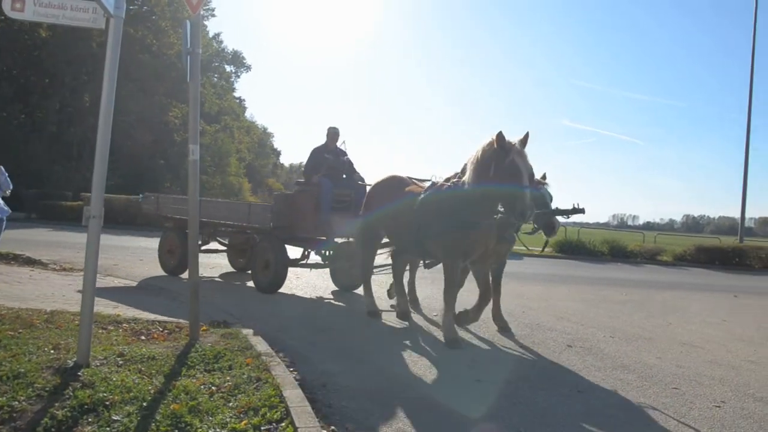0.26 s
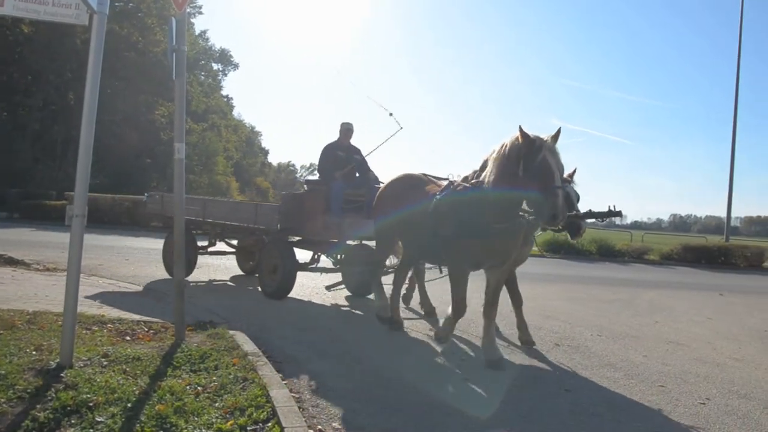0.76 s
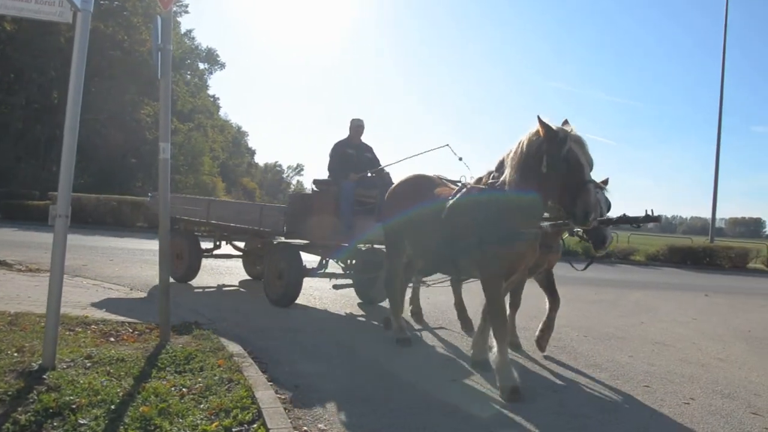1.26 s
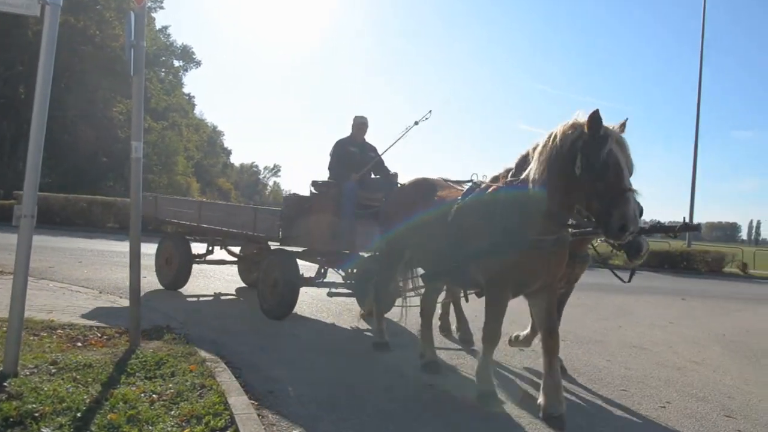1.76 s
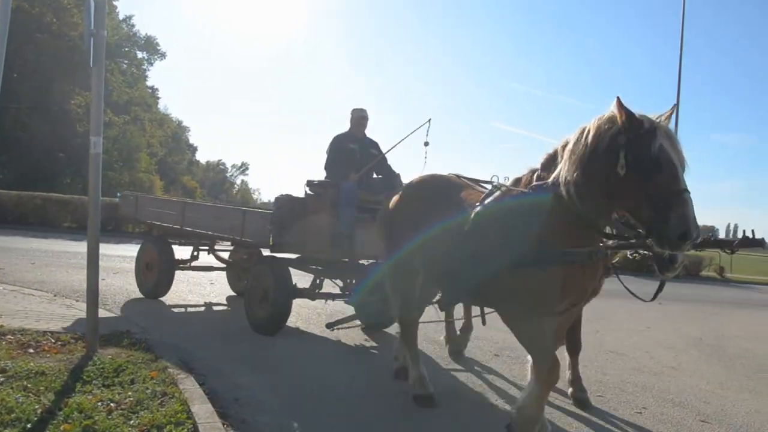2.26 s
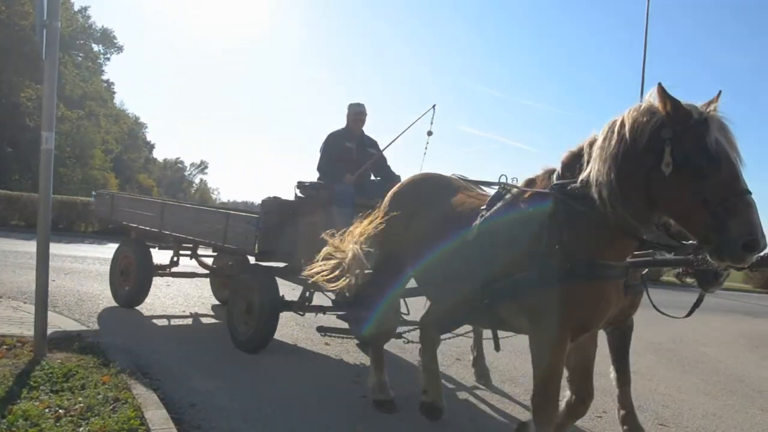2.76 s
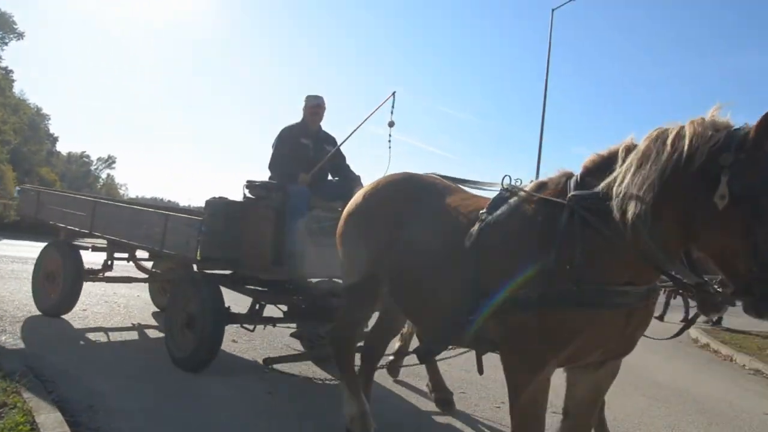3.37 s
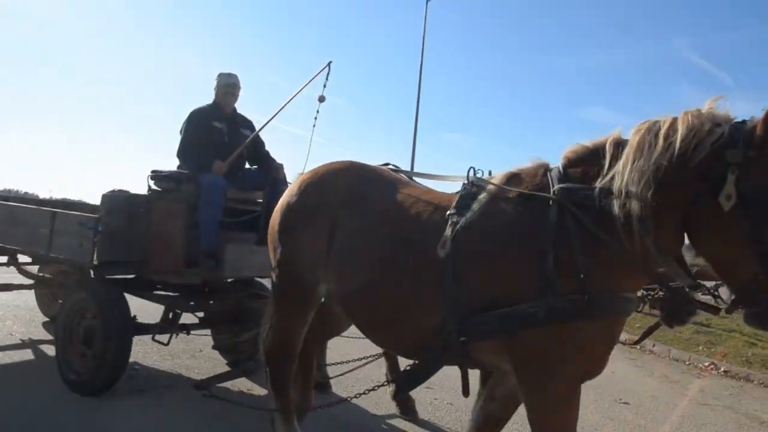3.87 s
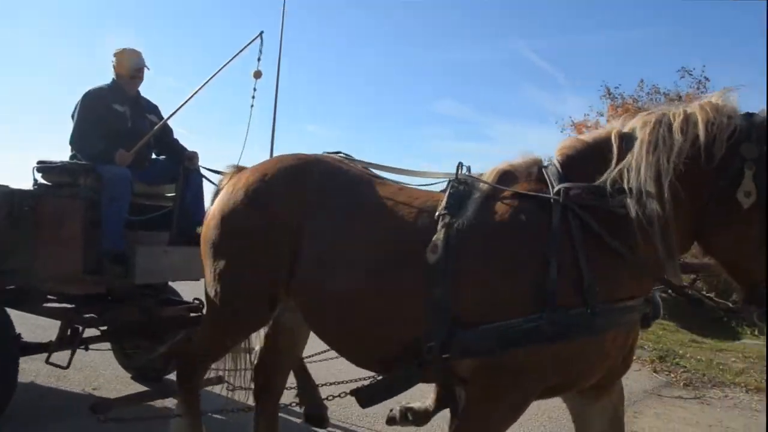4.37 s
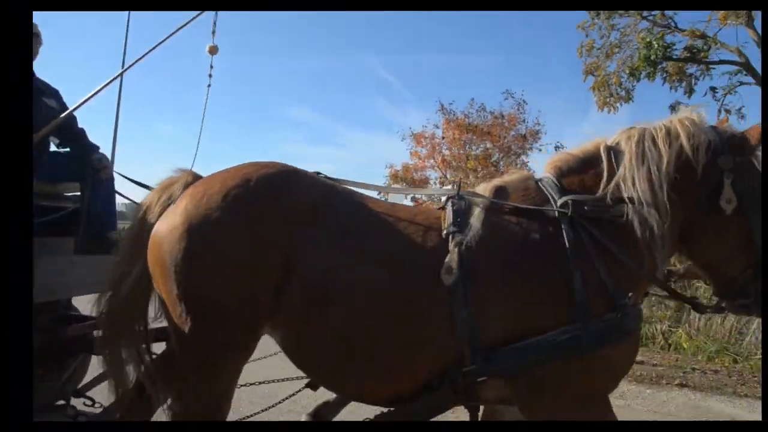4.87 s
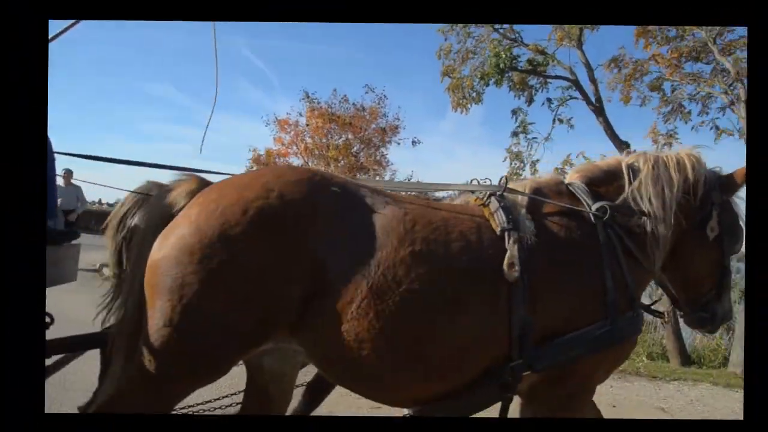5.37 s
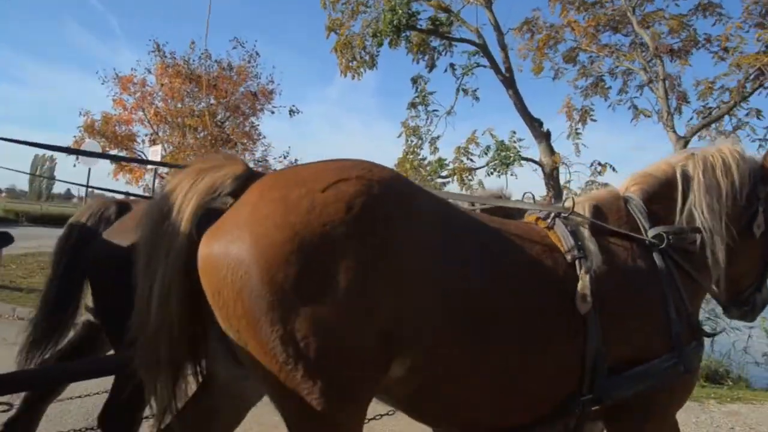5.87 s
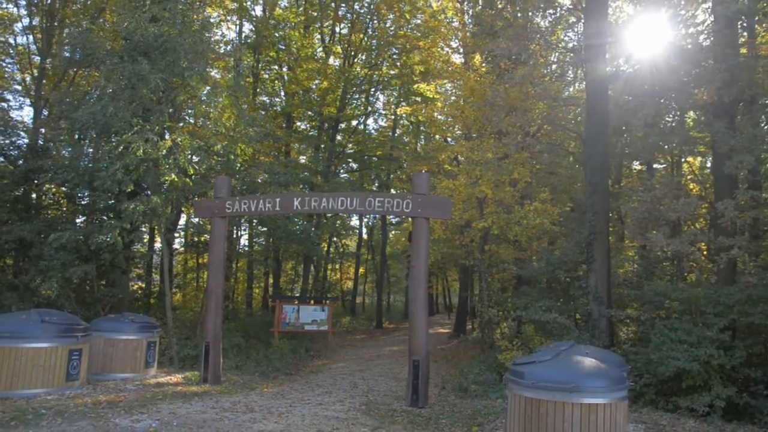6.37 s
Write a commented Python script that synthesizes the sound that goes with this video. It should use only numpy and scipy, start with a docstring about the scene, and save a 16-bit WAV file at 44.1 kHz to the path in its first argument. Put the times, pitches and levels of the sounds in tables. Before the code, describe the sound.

Two draught horses walk a wooden cart nearer, hooves knocking and harness ticking as wind buffets the microphone, until faint woodland ambience abruptly takes over.

```python
"""On a paved road, microphone about 5 m from two shod draught horses walking a wooden cart. From the start
hooves knock and slide on grit, harness links and shoes tick, wheels rumble and gusts buffet the microphone. A
dry cart joint squeaks at 1 s and, faintly, near 5 s; a thin whine comes and goes between 2 and 3 s. From almost
8 m the team then closes to 2.5 m. At 6 s the road cuts off and a quiet wood edge fades in: leaves, far traffic,
a few small ticks and the whine once more."""
import sys
import numpy as np
from scipy import signal
from scipy.fft import rfft, irfft, next_fast_len
from scipy.io import wavfile
from scipy.ndimage import uniform_filter1d, map_coordinates

SR = 44100
rng = np.random.default_rng(int(sys.argv[2]) if len(sys.argv) > 2 else 0)


def materialize(psi):
    """Save the field psi as 16-bit PCM at rate SR to the path in sys.argv[1].

    A 1-D psi becomes a single channel; in a 2-D psi each row is a channel.
    """
    bounded = np.clip(np.atleast_2d(psi).T, -1, 1)
    quanta = np.round(bounded * 32767).astype(np.int16)
    wavfile.write(sys.argv[1], SR, quanta)


N = 291501
T = np.arange(N) / SR
ROAD_END_S = 5.966
# from the microphone to the team: (time [s], distance [m])
TEAM_DISTANCE = [(0, 5.5), (2.8, 7.6), (4.6, 3.8), (5.96, 2.5)]


def hooves():
    """Each contact is a short blow and a slide over grit; they excite horn, hollow, iron and sand."""
    # shoe meets road: (time [s], level at the microphone [dB], clop pitch [Hz], thud [dB], shoe [dB],
    # grit [dB], scrape [dB]); the last four are relative to the clop
    contacts = [(0.001, -21.5, 1210, -12, -16, -25, -17), (0.201, -32.5, 1270, -15, -7, -43, 0.5),
                (0.227, -29, 1170, -30, -18, -34, -7), (0.352, -26.5, 1320, -25, -8, -34, 3.5),
                (0.538, -58.5, 1180, -14, 12, 3, 20.5), (0.574, -24.5, 1320, -24, 0.5, -24, -12),
                (0.614, -29, 1280, -13, -19, -43, -7), (0.625, -19.5, 1490, -18, -9.5, -29.5, -14.5),
                (0.649, -17, 930, -15, -16.5, -37, -10.5), (0.789, -25.5, 1520, -1.5, -17.5, -32.5, -6),
                (0.856, -25, 1450, -8.5, -24, -34, -19.5), (0.881, -31.5, 1030, -17, -7, -21.5, -10),
                (0.915, -26.5, 1350, -37, -10.5, -47, -3.5), (1.242, -28.5, 1350, -27, -7.5, -43, -27),
                (1.252, -26.5, 1300, -18, -26, -30, -2.5), (1.265, -27, 1380, -6, -8.5, -39.5, -11.5),
                (1.294, -29.5, 1410, -7, -23, -33, 1), (1.317, -34, 1510, 2, -10, -45.5, -8.5),
                (1.364, -27.5, 1580, -3.5, -16, -48.5, -5), (1.497, -36.5, 1360, -4.5, -9, -31, 0.5),
                (1.526, -17.5, 1094, -27, -37, -46.5, -5.5), (1.668, -25, 1460, -13, -4.5, -30.5, 3),
                (1.719, -42.5, 1290, -2, -6.5, -14, 5), (1.913, -23, 960, -5.5, -10.5, -24, 0),
                (1.926, -30, 850, -10, -10, -40, 13.5), (1.978, -18.5, 1085, -2.5, -5, -38, -21),
                (2.083, -40.5, 1460, 2, 0.5, -21.5, 0.5), (2.15, -26, 1390, -5, -2.5, -30.5, -16.5),
                (2.159, -26.5, 1370, -26, -7, -35, -8), (2.179, -30, 1360, 2, -5, -21, -18.5),
                (2.312, -20.5, 1580, -4.5, -7.5, -29, 2), (2.373, -30, 1220, -7.5, -12.5, -37, -8),
                (2.521, -23, 1140, -2, -4.5, -53, -16.5), (2.549, -21.5, 1460, -12.5, -12, -49, -9.5),
                (2.576, -27, 1350, -14, -12, -38.5, -16.5), (2.596, -29, 1420, -5, -13, -43, 0),
                (2.628, -25, 1120, -4, -16.5, -50, -7), (2.786, -33, 1240, -17, -1, -42, -13),
                (2.824, -29, 1100, -9, -12, -29, -1.5), (2.955, -24.5, 1420, -6, -4, -26.5, 4.5),
                (3.014, -34, 1360, -6, -26, -48, 8.5), (3.209, -22.5, 1050, -9.5, -4, -43, -24),
                (3.234, -17, 1040, -14, -17.5, -32, -14.5), (3.274, -27.5, 1180, -6, -17, -28, -6.5),
                (3.289, -34, 900, 2, -12, -40, -15), (3.311, -17.5, 1080, -21, -10, -36.5, -10.5),
                (3.401, -44.5, 1650, -14, -4.5, -8, 13), (3.468, -25.5, 1180, -4, -10, -43, -13),
                (3.49, -28.5, 1130, -9, -12, -27, -6), (3.556, -30.5, 1640, -8.5, -11, -46, 4),
                (3.641, -27, 990, -1.5, -29, -32.5, -6.5), (3.829, -33, 1140, -3, -15, -44, -15),
                (3.887, -30.5, 880, 0.5, -10.5, -25, -3.5), (3.9, -28.5, 1270, 4.5, -9, -31, -39),
                (3.921, -28.5, 940, -7, -3.5, -41, -6.5), (3.948, -26, 1050, -11, -16, -52, -5.5),
                (4.154, -21, 1020, 0.5, -50, -38, -20.5), (4.201, -37.5, 1470, -6, -9, -39, -18.5),
                (4.314, -37, 1520, -3.5, -12.5, -31, 0), (4.453, -20.5, 1030, -19.5, -11.5, -20, -11.5),
                (4.465, -12, 1000, -4.5, -21.5, -24, -28), (4.51, -30.5, 1100, -17, -19, -43, -10.5),
                (4.525, -25, 1270, -14.5, -5.5, -26.5, -2), (4.542, -21, 1030, 3.5, -21, -20, -15),
                (4.561, -22.5, 1200, -28, -1.5, -33, -19.5), (4.575, -18, 1240, -30, -21, -34, -13),
                (4.591, -12.5, 1120, -20.5, -10.5, -33.5, -11.5), (4.61, -22.5, 1440, -15, -7.5, -24, -9.5),
                (4.655, -20.5, 1240, -6, -10.5, -18, -14), (4.763, -28, 1360, -6, -8, -63, 7.5),
                (4.852, -31.5, 1427, 3, -12.5, -29.5, -5.5), (4.955, -38, 1130, -4.5, -4, -30, -9),
                (4.977, -27, 1240, -13, -9.5, -47, 11), (5.027, -22, 1840, -9, -8.5, -13.5, -12),
                (5.038, -23, 1870, -11, -15, -29, -12.5), (5.049, -22, 950, -6.5, -13, -31.5, -10),
                (5.109, -34.5, 1580, -6, -6.5, -17, -5.5), (5.126, -37.5, 1480, 0.5, -1.5, -11.5, -13),
                (5.152, -24, 912, -3, -21, -23.5, -3.5), (5.156, -17, 1060, -3, -7.5, -31, -13),
                (5.174, -27.5, 1340, -16, -27, -43.5, -7), (5.186, -23.5, 1133, -7, -19, -33, -15),
                (5.201, -20, 1100, -1.5, -20.5, -44.5, -5), (5.219, -28.5, 1200, -15, -5, -26.5, -17.5),
                (5.23, -23.5, 1140, -19, -6.5, -37, -17.5), (5.276, -33, 1150, -4.5, -35, -39, -11.5),
                (5.322, -33.5, 1530, -7, -31, -52, -7), (5.391, -31, 850, 3, -17, -33, -7.5),
                (5.412, -23.5, 910, -2.5, -12.5, -28, -2.5), (5.464, -24, 1180, -6.5, -7.5, -46, 5.5),
                (5.521, -30, 1430, -9, -8.5, -27, 2), (5.631, -27, 1750, -12, -18.5, -22.5, -2.5),
                (5.654, -29, 1040, 4.5, -26.5, -28, -13), (5.663, -31, 1100, -11, -5, -44.5, -1.5),
                (5.726, -28.5, 905, -7, -10, -25, -2), (5.762, -23.5, 1010, -11.5, -16, -39.5, -17.5),
                (5.783, -18.5, 880, -5.5, -21.5, -30, -5), (5.873, -27.5, 1474, -12.5, -1.5, -16, -23.5),
                (5.876, -13.5, 1510, -11.5, -6, -17.5, -10), (5.91, -22.5, 1590, -9, -14, -37, 2),
                (5.941, -25, 1840, -9, -3.5, -21.5, -12), (5.955, -24.5, 1803, -14.5, -23, -28, -1)]
    # resonances, each (pitch [Hz], width [Hz], level [dB])
    horn_modes = [(290, 154, -1.5), (486, 115, 2.5)]  # the thud of horn and leg
    sole_modes = [(747, 120, -8.5), (1143, 150, -7), (1725, 107, 0)]  # the hollow under the sole
    iron_modes = [(2313, 192, 4.5), (3460, 323, -5), (4264, 270, -8)]  # the shoe
    sand_modes = [(5500, 5400, 13), (8300, 4760, 14), (13400, 2300, 9)]  # sand crushed under it
    blow_t60_s, blow_rise_s, slide_s = 0.0079, 0.00098, 0.014
    snaps_per_s, crest_db = 350, 7
    air_db_per_m = 1.74  # loss at 12 kHz
    out, t = np.zeros(N), np.arange(SR // 8) / SR
    for s, db, hz, thud_db, shoe_db, grit_db, scrape_db in contacts:
        drag = amp(scrape_db)  # a dragged hoof lands softer and slides longer
        decay = amp(-60 * t / blow_t60_s)
        rise = 1 - np.exp(-t / (blow_rise_s + 0.0022 * drag))
        slide = np.exp(-(t / (slide_s + 0.012 * drag)) ** 1.4)
        slide *= 1 - np.exp(-t / (0.00029 + 0.00059 * drag))
        air = lambda f: amp(-air_db_per_m * metres_away(s) * (f / 12000) ** 2)
        slips = unit(uniform_filter1d(rng.standard_normal(len(t)), size=45))  # sand gives way unevenly
        breaks = rng.random(len(t)) < snaps_per_s / SR  # single grains break
        snaps = unit(breaks * rng.standard_normal(len(t)))
        # modes near the clop speak best: 5.5 dB less per octave away
        hollow = [(c, w, g - 5.5 * abs(np.log2(c / hz))) for c, w, g in sole_modes]
        parts = [(horn_modes, thud_db, 1.5, .52, 1), ([(hz, 200, 1.5)] + hollow, 0, 1.8, .38, 1),
                 (iron_modes, shoe_db, 4, .36, 1.6), (sand_modes, grit_db, 4.5, .22, 1.5)]
        for modes, part_db, roughness_db, slide_share, damping in parts:
            blow = decay ** damping * rise
            noise = rng.standard_normal(len(t))
            knock = blow * noise * np.linalg.norm(blow) / np.linalg.norm(blow * noise)
            knock[blow.argmax()] += 1.15 * np.linalg.norm(blow)  # iron meets stone in one instant
            friction = amp(roughness_db * slips) * noise + .55 * snaps
            force = knock + slide_share * drag * slide ** damping * friction
            varied = [(c * (1 + 0.047 * rng.standard_normal()), w, g + 1.83 * rng.standard_normal())
                      for c, w, g in modes]
            low, high = .5 * min(modes)[0], 2.6 * max(modes)[0]  # each part keeps to its own range
            band = lambda f: (1j * f / low / (1 + 1j * f / low) / (1 + 1j * f / high) ** 2) ** 2
            ring = filtered(force, lambda f: resonances(varied, f) * band(f) * air(f))
            loudest_rms = np.sqrt(uniform_filter1d(ring ** 2, size=176).max())  # over 4 ms
            add(out, s - .001, amp(db + part_db - crest_db) * ring / loudest_rms)
    return out


def harness():
    """Links and nail heads tick and shoes clink; now and then a shoe or chain link rings on."""
    # metal contacts, each (time [s], peak level [dB], pitch [Hz])
    metal_ticks = [(.2015, -28.5, 3910), (.686, -37, 1410), (.3727, -45, 7000), (2.3145, -30, 3940),
                   (2.787, -34.5, 4170), (3.3695, -52, 12300), (3.42, -52, 7400), (3.889, -49, 12300),
                   (3.9215, -34, 4300), (4.009, -47, 4130), (4.62, -52, 9000), (4.901, -47.5, 6400),
                   (5.3, -59.5, 8040), (5.031, -43, 8300), (5.7505, -38, 4000), (5.823, -44.5, 3690),
                   (5.963, -53, 8880)]
    iron_rings = [(.068, -50, 2500), (.203, -50, 4200), (2.316, -48, 3860), (2.73, -55, 2800),
                  (2.786, -50, 4350), (5.543, -47, 2800), (5.724, -48, 3300)]
    return ticks(metal_ticks, t60_s=0.0035, width=0.16) + ticks(iron_rings, t60_s=.09, width=0.047)


def gravel():
    """Loose stones crack under tyres and shoes, louder as the cart nears the microphone."""
    when, strength, pitch = rng.random((220, 3)).T
    s = when * ROAD_END_S
    db_at_1_m = -55.5 - 3.5 * np.log(strength)  # many faint, a few loud
    db = db_at_1_m - 20 * np.log10(metres_away(s))
    return ticks(zip(s, db, 1900 * 5.6 ** pitch), t60_s=0.0034, width=.5)


def squeaks():
    """Stick-slip in a dry cart joint: a wavering, throbbing tone with overtones and a faint tail."""
    # slips of the joint: (time [s], length [s], first pitch [Hz], last pitch [Hz], level [dB],
    # partial 2 [dB], partial 3 [dB], partial 4 [dB]); partials are relative to the first
    slips = [(.93, .07, 1122, 1110, -40, -25, -32, -47), (1.003, .048, 1100, 1070, -46, -14, -17, -30),
             (4.843, .013, 3040, 2910, -56, -6, -15, -36), (4.866, .022, 3020, 3035, -55, -4, -27, -30)]
    tail_drop_db, tail_db_per_s = 10, 300
    out, waver_hz = np.zeros(N), 22 * wobble(260)
    throbs_db = [4.2 * wobble(120) for _ in range(4)]
    for s, length, first_hz, last_hz, db, *partials_db in slips:
        hz = np.interp(T, [s, s + length], [first_hz, last_hz])
        phase = 2 * np.pi * np.cumsum(hz + waver_hz) / SR
        tail = (T > s + length) * amp(-tail_drop_db - tail_db_per_s * np.abs(T - s - length))
        shape = np.maximum(held(s, length, edge_s=.006), tail)
        for k, part_db in enumerate([0, *partials_db]):
            level = shape ** (1 + k / 2) * amp(db + part_db + throbs_db[k])
            out += np.sqrt(2) * level * np.sin((k + 1) * phase)
    return out


def echoes(team):
    """A short tail scattered off cart, bodies and kerb, new every quarter second as the team moves."""
    # decay of the echoes: (frequency [Hz], t60 [s])
    decay_times = [(300, 0.027), (1400, 0.14), (4000, 0.18), (12000, 0.14)]
    out, hop = np.zeros(N), SR // 4
    for start in range(0, N, hop):
        hz, t, bins = signal.stft(rng.standard_normal(SR // 3), SR, nperseg=256)
        tail = signal.istft(bins * amp(-60 * t / along(decay_times, hz)[:, None]), SR, nperseg=256)[1]
        tail /= np.linalg.norm(tail)
        add(out, start / SR + .004, signal.fftconvolve(team[start:start + hop], tail))
    return out


def wind():
    """Eddies burst right on the microphone port in lumps; the strongest thump for about one cycle."""
    # wind on the port: (time [s], level [dB])
    gusts = [(0, -31), (.43, -42), (.8, -30), (.95, -33.5), (1.08, -28.5), (1.18, -35), (1.31, -30),
             (1.53, -36.5), (1.6, -43.5), (1.84, -32.5), (2.02, -32.5), (2.06, -47), (2.12, -30.5),
             (2.24, -57), (2.3, -23.5), (2.38, -48.5), (2.5, -35.5), (2.87, -32.5), (2.93, -39.5),
             (3.34, -45.5), (3.39, -27.5), (3.53, -55), (3.69, -67), (3.73, -26), (3.79, -41), (3.84, -45),
             (4.2, -42.5), (5.35, -57), (5.5, -40), (5.96, -57.5)]
    # colour of the buffeting: (frequency [Hz], relative level [dB])
    buffet_spectrum = [(11, -51), (30, -7), (102, 3.5), (199, -3.5), (251, -9.5), (548, -24.5), (700, -34),
                       (910, -63.5), (1540, -120)]
    # the strongest eddies: (time [s], level [dB], pitch [Hz])
    thumps = [(0.037, -22.5, 180), (0.089, -25, 303), (0.507, -20.5, 216), (0.714, -20, 154),
              (0.77, -18, 231), (0.78, -23, 132), (0.8, -19, 169), (0.909, -20.5, 155), (1.053, -16, 197),
              (1.064, -16.5, 147), (1.11, -17, 190), (1.218, -19, 166), (1.28, -20, 163),
              (1.337, -21.5, 168), (1.369, -18.5, 198), (1.465, -24, 150), (1.542, -21, 132),
              (1.761, -20, 163), (1.822, -21, 208), (1.857, -21, 125), (1.931, -19, 272), (1.981, -21, 135),
              (2.026, -16.5, 171), (2.037, -19, 171), (2.186, -20, 160), (2.288, -19, 184),
              (2.622, -18.5, 201.6), (2.654, -15, 278), (2.688, -17.5, 127), (2.747, -22.5, 155.0),
              (2.879, -17.5, 194), (3.724, -20, 121), (3.763, -17, 187), (3.781, -19, 213)]
    front_db, front_ratio = -16.5, 2.69  # a higher partial steepens each thump
    lumps = amp(2.84 * wobble(65) + 0.85 * wobble(18))
    out = amp(curve(gusts)) * unit(lumps * rush(buffet_spectrum, patchy_db=2.0))
    t = np.arange(-SR // 50, SR // 50) / SR
    for s, db, hz in thumps:
        cycle = np.cos(2 * np.pi * hz * t + rng.uniform(0, 2 * np.pi))
        cycle += amp(front_db) * np.cos(2 * np.pi * front_ratio * hz * t + rng.uniform(0, 2 * np.pi))
        add(out, s + t[0], amp(db) * np.exp(-(t * hz / 0.39) ** 2) * cycle)
    return out


def cart():
    """Tyres and boards rumble unevenly over a faint steady hiss."""
    # wheels on the road, heard at the microphone: (time [s], level [dB])
    rolling = [(0, -52), (4.05, -52.5), (4.6, -52.5), (5.96, -48.5)]
    # colours of rumble and hiss, each (frequency [Hz], relative level [dB])
    wheel_spectrum = [(22, -21), (65, 4.5), (200, -11.5), (470, -6.5), (652, -7), (1070, -3), (1550, -7),
                      (1950, -11), (2380, -14), (6000, -41), (7800, -74.5), (13200, -120)]
    hiss_spectrum = [(3000, -34), (4000, -5), (5200, -13), (8000, -10), (14400, -19), (16000, -43.5)]
    rumble, hiss = rush(wheel_spectrum, patchy_db=1.8), rush(hiss_spectrum, patchy_db=.6)
    rumble_db = curve(rolling) + 0.4 * wobble(21) + 2.4 * wobble(50)
    return amp(rumble_db) * rumble + amp(-79.0) * hiss


def wood_edge():
    """Leaves and far traffic blend into one soft rush, with small ticks from among the trees."""
    # leaves and traffic: (frequency [Hz], relative level [dB])
    leaf_spectrum = [(15, -43), (25, -6), (55, -3), (120, -5), (545, -5.5), (677, -7.5), (818, -8.5),
                     (962, -3.5), (2160, -12), (2350, -12.5), (3160, -20.5), (16000, -50)]
    # ticks in the wood: (time [s], peak level before the fade [dB], pitch [Hz])
    twigs = [(6.106, -33, 2510), (6.125, -46, 3260), (6.158, -31.5, 1720), (6.354, -44, 4670),
             (6.543, -38, 980)]
    leaves = amp(-50.5 + 0.29 * wobble(30)) * rush(leaf_spectrum, patchy_db=3.0)
    return leaves + ticks(twigs, t60_s=0.009, width=0.42)


def whine(hz=2299):
    """A thin tone with a slight flutter comes and goes in the background of both places."""
    # spells of the tone: (time [s], length [s], level before the fade [dB])
    spells = [(2.02, .14, -66), (2.33, .08, -64), (2.85, .24, -63), (6.2, .28, -63)]
    level = sum(amp(db) * held(s, length, edge_s=.02) for s, length, db in spells)
    flutter = amp(1.1 * wobble(15))
    return np.sqrt(2) * level * flutter * np.sin(2 * np.pi * hz * T + 0.27 * wobble(6.9))


def ticks(rows, t60_s, width):
    """Tiny hard contacts: clicks of noise around one pitch each; width is a fraction of that pitch."""
    out, t = np.zeros(N), np.arange(SR // 16) / SR
    envelope = amp(-60 * t / t60_s) * (1 - np.exp(-t / .0003))
    for s, db, hz in rows:
        burst = envelope * rng.standard_normal(len(t))
        click = filtered(burst, lambda f: resonances([(hz, width * hz, 0)], f) ** 2)
        add(out, s - .001, amp(db) * click / np.abs(click).max())
    return out


def rush(spectrum, patchy_db):
    """Coloured noise of rms 1 with patches of random gain in time and frequency."""
    bins = signal.stft(rng.standard_normal(N), nperseg=512)[2]
    patches = uniform_filter1d(uniform_filter1d(rng.standard_normal(bins.shape), 6, 0), 8, 1)
    noise = signal.istft(bins * amp(patchy_db * unit(patches)), nperseg=512)[1][:N]
    return unit(filtered(noise, lambda hz: amp(along(spectrum, hz))))


def resonances(modes, f):
    """Causal response at f of modes (pitch [Hz], width [Hz], level [dB])."""
    return sum((-1) ** k * amp(db) * 1j * f * w / (c * c - f * f + 1j * f * w)
               for k, (c, w, db) in enumerate(modes))


def filtered(x, response):
    """x through a complex response of frequency."""
    n = x.shape[-1]
    padded = next_fast_len(n + 4096)
    return irfft(rfft(x, padded) * response(np.fft.rfftfreq(padded, 1 / SR)), padded)[..., :n]


def metres_away(s):
    """Distance of the team from the microphone at time s."""
    return np.interp(s, *np.transpose(TEAM_DISTANCE))


def amp(db):
    """Gain of a level in dB."""
    return 10 ** (np.asarray(db) / 20)


def unit(x):
    """Scaled to rms 1."""
    return x / np.sqrt(np.mean(x ** 2) + 1e-20)


def along(points, hz):
    """Points (frequency [Hz], value) read at hz on a log axis."""
    f, values = np.transpose(points)
    return np.interp(np.log(hz + 1), np.log(f + 1), values)


def curve(points):
    """Points (time [s], value) read at every sample."""
    return np.interp(T, *np.transpose(points))


def wobble(rate):
    """A smooth random curve, rate knots a second."""
    return map_coordinates(rng.standard_normal(int(N * rate / SR) + 4), [T * rate])


def held(start, length, edge_s):
    """Rises to 1 over edge_s, holds, and falls back to 0."""
    return np.interp(T, [start - edge_s, start, start + length, start + length + edge_s], [0, 1, 1, 0])


def add(track, s, sound):
    """Mixes a sound in at time s."""
    part = track[max(round(s * SR), 0):][:len(sound)]
    part += sound[:len(part)]


def scene():
    """Two places in mono: the road until it cuts off, then the wood edge on a swelling fade."""
    fade_start_s, fade_rise_s, fade_from_db = 6.024, 0.25, -34.5
    team = hooves() + harness() + gravel() + squeaks()
    tone = whine()
    road = team + amp(-11.5) * echoes(team) + wind() + cart() + tone
    cut_off = amp(np.interp(T, [ROAD_END_S, ROAD_END_S + .002, ROAD_END_S + 0.03], [0, -35, -75]))
    progress = np.clip(T - fade_start_s, 0, None) / fade_rise_s
    fade_in = (T > ROAD_END_S) * amp(fade_from_db * np.exp(-progress ** 1.93))
    return (road * cut_off + fade_in * (wood_edge() + tone))[None]


def record(dry):
    """The camera microphone passes nothing above 15.9 kHz."""
    return filtered(dry, lambda hz: hz < 15900)


dry = scene()
out = record(dry)
materialize(out)
```